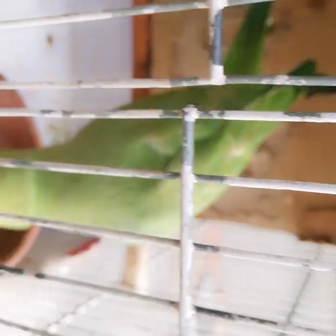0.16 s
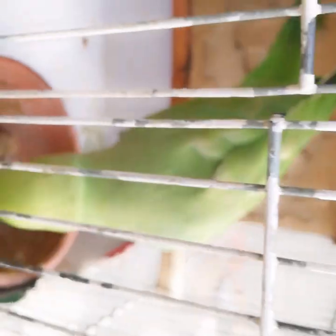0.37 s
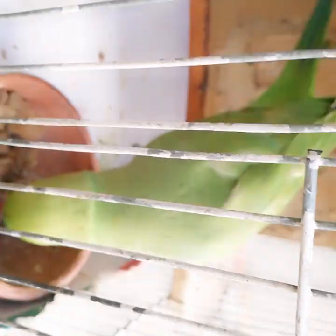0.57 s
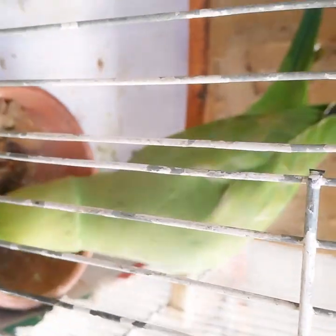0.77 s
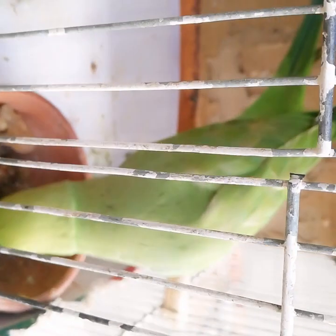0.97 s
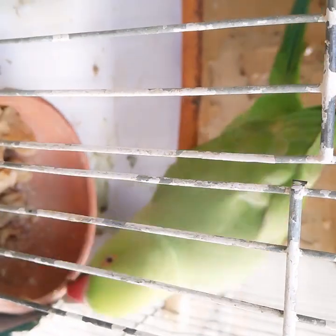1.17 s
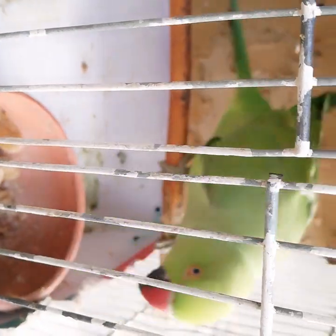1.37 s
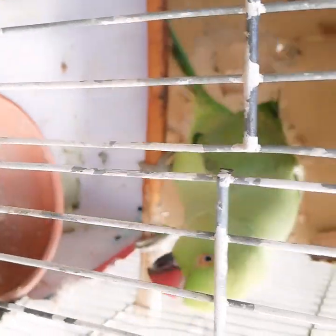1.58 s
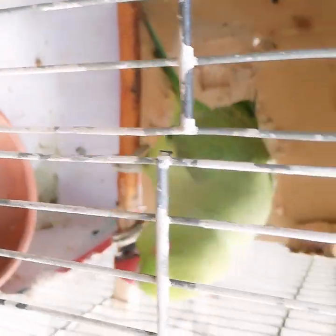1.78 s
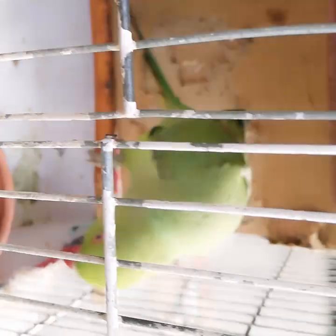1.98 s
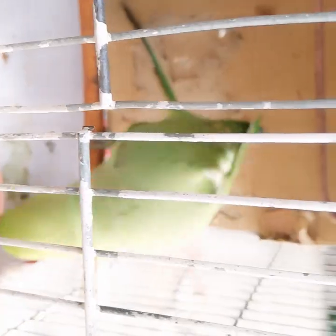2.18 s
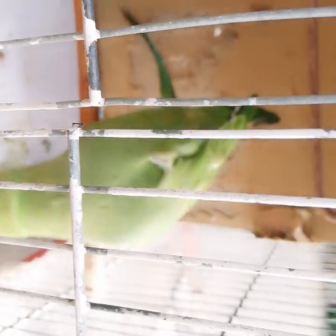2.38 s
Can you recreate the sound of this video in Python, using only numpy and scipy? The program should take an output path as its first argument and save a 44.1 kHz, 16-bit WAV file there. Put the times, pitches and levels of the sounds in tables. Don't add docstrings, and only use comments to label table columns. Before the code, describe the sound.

A caged parrot gives two loud, clear-then-raspy squawks and a shorter, weaker third, overlapped by a second bird's swooping whistle; distant warbling follows, then a brief rising whistle, close-miked in a hard-walled room with light hiss.

```python
import sys
import numpy as np
from scipy import signal
from scipy.fft import rfft, irfft, next_fast_len
from scipy.io import wavfile
from scipy.ndimage import uniform_filter1d

SR = 44100
rng = np.random.default_rng(int(sys.argv[2]) if len(sys.argv) > 2 else 0)


def boost(x):
    u = np.asarray(x, float) / 20
    return 10 ** u


def digitize_waveform(pressure):
    field = np.atleast_2d(pressure).T
    bounded = np.clip(field, -1, 1)
    quanta = np.round(bounded * 32767).astype(np.int16)
    wavfile.write(sys.argv[1], SR, quanta)


N = 108045

# freq_hz, level_db
HISS = [(120, -42), (200, -8), (640, -7), (825, -13.5), (1620, -14), (5080, -17.5), (10100, -16),
        (15400, -28)]
RUMBLE = [(12, -40.5), (20, -2.5), (65, -3.5), (124, -2.5), (182, -12), (204, -14.5), (300, -28),
          (390, -41), (660, -120)]
# freq_hz, likeness_0_1
FLOOR_LIKENESS = [(60, 0.52), (240, 0.92), (950, 0.082), (3760, 0.05), (14900, 0.03)]
# freq_hz, level_db
FLOOR_PORTS = [(60, 1.5), (550, 2), (1640, 5.5), (6000, 4.5), (9500, 23.5), (14000, 11.5)]
PORTS = [(200, -1.5), (800, 8.5), (1600, 10), (3500, 13), (6500, 9.5), (9500, 21), (12000, 17.5),
         (15000, 12.5)]
# freq_hz, t60_s
ROOM_T60 = [(300, 0.94), (800, 0.29), (2000, 0.32), (5000, 0.34), (10000, 0.33)]
# delay_s, left_db, right_db
ECHOES = [(.0021, -27.5, -6.5), (.0047, -19.5, -11.5), (.0083, -9.5, -6), (.013, -14.5, -14),
          (.019, -12, -9)]
# freq_hz, t60_s, level_db
BOWL = (645, .55, 5)
# freq_hz, level_db
AIR = [(9000, -5), (15500, -16)]
# start_s, length_s, from_hz, to_hz, level_db
WARBLE = [(-.06, 0.044, 5346, 2955, -34), (.785, 0.018, 3530, 4360, -41.5),
          (0.842, 0.013, 4700, 5505, -37.5), (0.849, 0.028, 5100, 4560, -34),
          (0.871, .015, 5660, 4702, -43), (.922, 0.017, 4830, 3547, -37), (0.94, .012, 3700, 4744, -38.5),
          (.955, .015, 4700, 3860, -38), (1.048, 0.013, 4270, 4870, -44), (1.724, 0.031, 4200, 4700, -53),
          (1.726, 0.033, 6230, 6990, -47.5), (1.756, .03, 4050, 4213, -48), (1.754, 0.023, 8800, 9400, -55),
          (1.785, .012, 4950, 3844, -45), (1.806, .012, 3600, 4600, -50.5), (1.827, .014, 4840, 3880, -45),
          (1.846, 0.018, 3540, 5100, -49), (1.859, .016, 5125, 4680, -46), (1.874, .007, 4340, 3330, -55.5),
          (1.898, .027, 3430, 4245, -44.5), (1.927, 0.014, 4420, 4600, -57),
          (1.936, 0.0088, 4075, 2735, -51), (1.97, 0.014, 5300, 6200, -51.5),
          (1.965, 0.019, 8230, 8300, -52), (1.982, .008, 6350, 6940, -42),
          (1.987, 0.012, 3730, 5280, -44.5), (1.995, 0.027, 5410, 5104, -39),
          (2.02, 0.0069, 5160, 3510, -40.5), (2.023, 0.012, 3335, 5160, -41),
          (2.033, 0.01302, 5040, 3240, -41.5), (2.05, .009, 3500, 2500, -46.5)]
# start_s, level_db, lowest_hz
TICKS = [
    (.127, -49, 7660),
    (1.345, -56, 6390),
    (1.4753, -47, 1170),
    (1.564, -48, 1820),
]
# start_s, level_db, freq_hz
BUMPS = [
    (2.292, -29.5, 65.3),
]
# start_s, length_s, pitch_hz, level_db
COOS = [
    (0.144, 0.051, 723, -54),
    (1.632, 0.036, 732, -57.5),
]
# time_s, pitch_hz, level_db
SWOOP = [(0.511, 1424, -44.5), (.53, 1316, -26.5), (0.601, 1193, -30), (.75, 1160, -36),
         (0.919, 1176, -33.5), (0.973, 1280, -24), (1.008, 1453, -15.5), (1.04, 1825, -25.5),
         (1.056, 2085, -38)]
RISE = [(2.342, 1192, -72), (2.365, 1278, -51.5), (2.387, 1432, -31), (2.398, 1537, -29),
        (2.408, 1676, -36), (2.419, 1790, -27), (2.434, 2027, -67)]
WHISTLE_OCTAVE_DB = (-40, -35)
# time_s, pitch_hz, level_db, roughness_0_1
SQUAWK_1 = [(.222, 790, -33, 0), (.231, 791.2, -10.5, 0.11), (.262, 799.2, -14, 0),
            (.295, 790.4, -17, 0.03), (.32, 784, -13.5, .005), (.345, 778, -10, 0.09),
            (.358, 769, -25, 0.6), (.375, 776, -31, 0.7), (.397, 747, -34.5, 0.81)]
SQUAWK_2 = [(.53, 807, -28, .1), (0.553, 862, -12.5, 0.016), (0.595, 834.5, -15, .004),
            (0.613, 807, -13, .003), (0.674, 819, -11.5, 0.0037), (0.706, 842, -14.5, .005),
            (.745, 856.9, -12.5, .008), (.795, 821.7, -10, .02), (.85, 817, -19, .3)]
SQUAWK_3 = [(1.058, 500, -42, .8), (1.084, 615, -31, .5), (1.096, 630, -29, .08), (1.124, 642, -15.5, .005),
            (1.137, 636, -19, .01), (1.156, 578, -25, .04), (1.174, 515, -26, .18), (1.19, 520, -35, .6),
            (1.221, 560, -48, .8)]
LEAD_1 = [(.178, 598, -59, 0.34), (0.184, 647, -31, 0.72), (.199, 651.6, -16, .06), (0.226, 686, -14, .04),
          (0.239, 692, -15.5, .05), (0.25, 690, -38, 0.1026)]
LEAD_2 = [(.507, 716, -46.5, 0.94), (.518, 678.5, -27.5, 0.86), (.527, 680, -11.5, .15),
          (.548, 702, -14.5, 0.071), (.562, 680, -38, 0.26)]
TRAIL_2 = [(.805, 759.2, -43, 0.86), (.82, 746.7, -36.5, 0.65), (0.851, 741.3, -21.5, 0.43),
           (.885, 696.6, -20.5, 0.4), (0.929, 660.2, -29, 0.59), (.97, 646.4, -36.5, 0.8),
           (1.05, 660, -50.5, 1)]
# freq_hz, level_db
THROAT = [(750, 0), (1300, -6), (1700, -9), (2400, -24), (3300, -29), (4100, -47), (5900, -35),
          (15500, -44)]
RASP = [(380, -56.5), (520, -12), (720, -4.5), (1780, -7.5), (3700, -37.5), (5000, -25.5), (9000, -39.5),
        (15500, -52.5)]
# freq_hz, width_hz, level_db
HOLLOWS = [(7610, 800, -8.5), (9500, 240, 0.5), (12300, 1800, -4.5)]
# treble_db, mouth_db, beak_hz, beak_width_hz, beak_db
COLOURS = [
    (0, 0, 3150, 90, 5),
    (1, 0, 3245, 55, 15),
    (12, 6, 4150, 480, 16),
    (0, -1, 3200, 90, 0),
    (0, -4, 3200, 90, 0),
    (4, 0, 3200, 90, 4),
]

HISS_DB, RUMBLE_DB = -58, -59.5
EDGE_HZ = 15600
RIGHT_LAG_S = 0.00017
PARROT_WET_DB, WHISTLE_WET_DB = -8, -17
WARBLE_OCTAVE_DB, WARBLE_DRY_DB, WARBLE_AIR_DB, WARBLE_FUZZ = -15, -0.5, -9.5, 0.014
TICK_DECAY_S = 0.0062
PITCH_WAVER, ROUGH_JITTER, JITTER_HZ = 0.0066, 0.22, 369
LEVEL_WAVER_DB, PATCHY_DB = 0.58, 2
PHASE_SMEAR_RAD = 0.075
RASP_DB, BREATH_DB = 8, -41
MOUTH_HZ, MOUTH_WIDTH_HZ = 1280, 90


def evened(x):
    return x / np.sqrt(np.mean(x ** 2) + 1e-20)


def read(points, hz):
    f, value = np.transpose(points)
    return np.interp(np.log(hz + 1), np.log(f + 1), value)


def bell(f, hz, width_hz, db):
    return db * np.exp(-((f - hz) / width_hz) ** 2)


def add(mix, start_s, sound):
    at = round(start_s * SR)
    part = mix[max(at, 0):][:len(sound) + min(at, 0)]
    part += sound[max(-at, 0):][:len(part)]


def colour(x, points):
    size = next_fast_len(x.shape[-1] + 2048)
    gain = boost(read(points, np.fft.rfftfreq(size, 1 / SR)))
    return irfft(rfft(x, size) * gain, size)[..., :x.shape[-1]]


def wobble(count, hz):
    lowpass = signal.butter(2, hz, fs=SR, output="sos")
    return evened(signal.sosfilt(lowpass, rng.standard_normal(count + 4000))[4000:])


def curves(rows):
    times, *columns = np.transpose(rows)
    t = times[0] + np.arange(round((times[-1] - times[0]) * SR) + 400) / SR
    gate = uniform_filter1d((t < times[-1]) * 1., size=300)
    return [np.interp(t, times, c) for c in columns] + [gate]


def floor():
    frames, hz = N // 256 + 5, np.fft.rfftfreq(1024, 1 / SR)
    a, b, c, d, patches = rng.standard_normal((frames, 513, 5)).T
    patches = evened(uniform_filter1d(uniform_filter1d(patches, 12, 0), 14, 1))
    same = np.clip(read(FLOOR_LIKENESS, hz), -1, 1)[:, None]
    left = a + 1j * b
    right = same * left + np.sqrt(1 - same ** 2) * (c + 1j * d)
    z = np.array([left, right]) * boost(patches)
    z *= boost(np.array([[.5], [-.5]]) * read(FLOOR_PORTS, hz))[..., None]
    out = 0
    for shape, db in ((HISS, HISS_DB), (RUMBLE, RUMBLE_DB)):
        shaped = z * boost(read(shape, hz))[:, None]
        layer = signal.istft(shaped, nperseg=1024, noverlap=768)[1][:, :N]
        out = out + boost(db) * layer / np.sqrt(np.mean(layer.mean(0) ** 2))
    return out


def room(x, stretch):
    taps = np.zeros((2, SR))
    at = np.arange(300, SR - 20, 20) + rng.integers(0, 20, (2, (SR - 301) // 20))
    np.put_along_axis(taps, at, rng.choice([-1., 1.], at.shape), 1)
    hz, t, z = signal.stft(taps, SR, nperseg=256)
    decay = boost(-60 * t / (stretch * read(ROOM_T60, hz))[:, None])
    tail = signal.istft(z * decay, SR, nperseg=256)[1]
    return signal.fftconvolve(x[None], tail / np.linalg.norm(tail[0]), axes=1)[:, :len(x)]


def early(x):
    taps = np.zeros((2, 1200))
    taps[:, 0] = 1
    for k, (delay_s, left_db, right_db) in enumerate(ECHOES):
        taps[:, round(delay_s * SR)] = (-1) ** k * boost(np.array([left_db, right_db]))
    return signal.oaconvolve(x[None], taps, axes=1)[:, :N]


def bowl(x):
    hz, t60_s, db = BOWL
    t = np.arange(SR // 2) / SR
    decay = boost(-60 * t / t60_s)
    ring = decay * np.sin(2 * np.pi * hz * t)
    return boost(db) * signal.oaconvolve(x, 2 * ring / decay.sum())[:N]


def ports(x):
    size = next_fast_len(N + 2048)
    hz = np.fft.rfftfreq(size, 1 / SR)
    left = boost(read(PORTS, hz))
    right = np.exp(-2j * np.pi * hz * RIGHT_LAG_S)
    return irfft(rfft(x, size) * np.array([left, right]) * boost(-5), size)[:, :N]


def note(length_s, from_hz, to_hz, db, octave_db, fuzz, air_db):
    u = np.arange(0, 1, 1 / (length_s * SR))
    hz = (from_hz + (to_hz - from_hz) * u) * (1 + fuzz * wobble(8000, 600)[:len(u)])
    phase = 2 * np.pi * np.cumsum(hz) / SR
    air = colour(rng.standard_normal(8000), [(2600, -23), (3600, 5.5), (12000, 0)])[:len(u)]
    tone = np.sin(phase) + boost(octave_db) * np.sin(2 * phase)
    return boost(db) * np.sqrt(np.sin(np.pi * u)) * 2 * (tone + boost(air_db) * air)


def warble():
    lead = 4410
    x = np.zeros(N + lead)
    for start_s, *row in WARBLE:
        add(x, start_s + lead / SR, note(*row, WARBLE_OCTAVE_DB, WARBLE_FUZZ, WARBLE_AIR_DB))
    x = colour(x, AIR)
    heard = boost(WARBLE_DRY_DB) * x + room(x, 0.93)
    return heard[:, lead:] * boost(np.array([[1.5], [-1.5]]))


def ticks():
    x, t = np.zeros(N), np.arange(400) / SR
    for start_s, db, low_hz in TICKS:
        burst = rng.standard_normal(400) * np.exp(-t / TICK_DECAY_S)
        wire = [(0.51 * low_hz, -30), (low_hz, 0), (12500, -6), (15000, -24)]
        add(x, start_s, boost(db + 14.0) * colour(burst, wire))
    for start_s, db, hz in BUMPS:
        u = np.arange(0, 1, hz / SR)
        add(x, start_s, boost(db) * np.sin(np.pi * u) * np.sin(2 * np.pi * u))
    return colour(x, AIR)


def whistle(rows, octave_db):
    hz, db, gate = curves(rows)
    phase = 2 * np.pi * np.cumsum(hz) / SR
    tone = np.sin(phase) + boost(octave_db) * np.sin(2 * phase)
    return rows[0][0], np.sqrt(2) * boost(db) * gate * tone


def piper():
    x = np.zeros(N)
    for rows, octave_db in zip((SWOOP, RISE), WHISTLE_OCTAVE_DB):
        add(x, *whistle(rows, octave_db))
    for start_s, length_s, hz, db in COOS:
        add(x, start_s, note(length_s, hz, hz, db, -18, 0.022, -62.5))
    return x


def squawk(rows, bright_db, mouth_db, *beak):
    hz, db, rough, gate = curves(rows)
    rough, n = np.clip(rough, 0, 1), len(hz)
    harsh = rough * np.sqrt(rough)
    drift = PITCH_WAVER * wobble(n, 40) + ROUGH_JITTER * harsh * wobble(n, JITTER_HZ)
    turns = np.cumsum(hz * (1 + drift)) / SR
    lift = [(2500, 0.0087), (4000, bright_db)]
    slip = PHASE_SMEAR_RAD * wobble(n, 210)
    tone = 0
    for k in range(1, 25):
        f = k * hz
        level_db = read(THROAT, f) + read(lift, f)
        level_db += bell(f, MOUTH_HZ, MOUTH_WIDTH_HZ, mouth_db) + bell(f, *beak)
        level_db += sum(bell(f, *row) for row in HOLLOWS)
        level_db += (LEVEL_WAVER_DB + PATCHY_DB * np.log(max(k - 2, 1))) * wobble(n, 67)
        phase = 2 * np.pi * (k * turns + rng.random()) + max(k - 4, 0) * slip
        tone = tone + boost(level_db) * (f < EDGE_HZ) * np.cos(phase)
    puffs = (0.28 + np.exp(-(turns % 1) / 0.45)) * rng.standard_normal(n)
    puffs = puffs * boost(2.5 * wobble(n, 80))
    rasp = colour(evened(colour(puffs, RASP)), lift)
    breath = evened(colour(puffs, [(4200, -43.5), (5500, 10), (9000, -10.0), (15500, -14.5)]))
    mix = np.sqrt(1 - rough) * evened(tone) + boost(RASP_DB) * harsh * rasp + boost(BREATH_DB) * breath
    return rows[0][0], boost(db) * gate * mix


def parrot():
    x = np.zeros(N)
    voices = (SQUAWK_1, SQUAWK_2, SQUAWK_3, LEAD_1, LEAD_2, TRAIL_2)
    for rows, tint in zip(voices, COLOURS):
        add(x, *squawk(rows, *tint))
    return x


def scene():
    squawks, whistles, claws = parrot(), piper(), ticks()
    birds = boost(-1.0) * early(squawks) + bowl(squawks) + claws + whistles
    birds = birds + boost(PARROT_WET_DB) * room(squawks + 0.17 * claws, 0.9)
    birds = birds + boost(WHISTLE_WET_DB) * room(whistles, 0.35)
    return ports(birds + warble()) + floor()


def roll_off(x):
    return signal.sosfilt(signal.butter(12, 15530, fs=SR, output="sos"), x)


def record(dry):
    lowpass = signal.firwin(511, EDGE_HZ, window=("kaiser", 9), fs=SR)
    x = signal.oaconvolve(dry, lowpass[None], "same")
    return roll_off(np.clip(x, -1, 1))


dry = scene()
out = record(dry)
digitize_waveform(out)
```